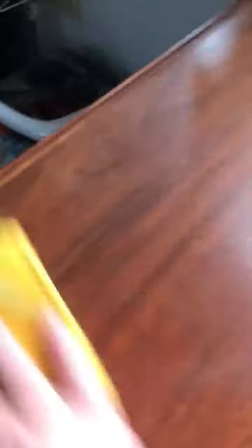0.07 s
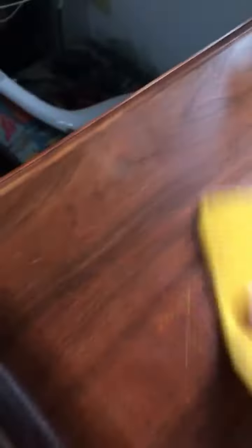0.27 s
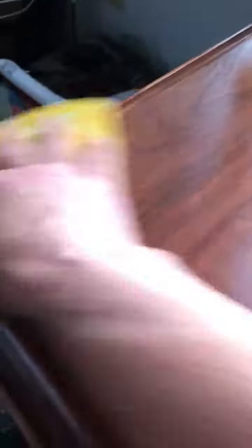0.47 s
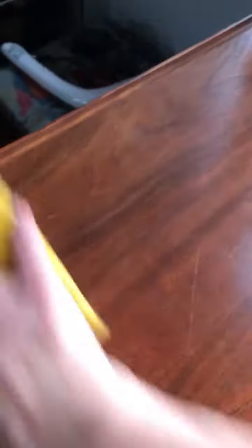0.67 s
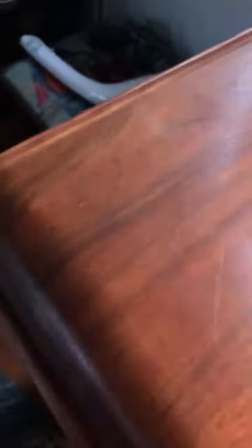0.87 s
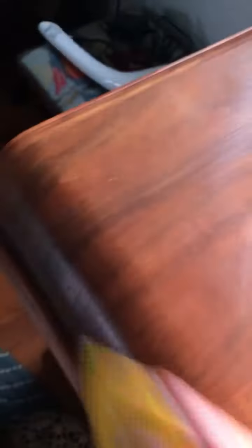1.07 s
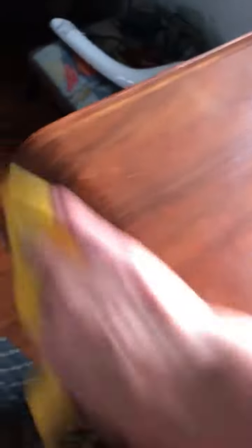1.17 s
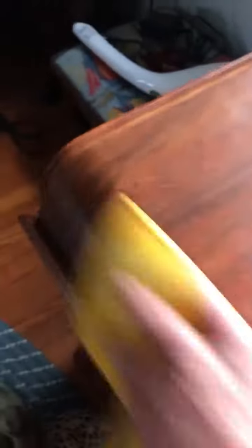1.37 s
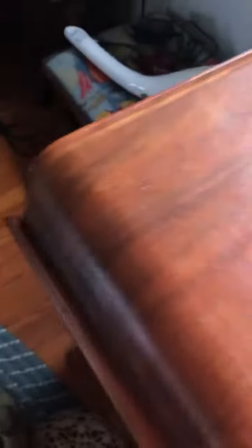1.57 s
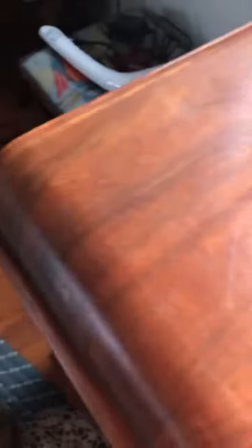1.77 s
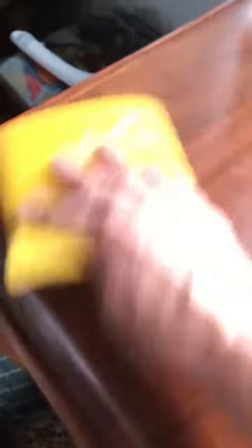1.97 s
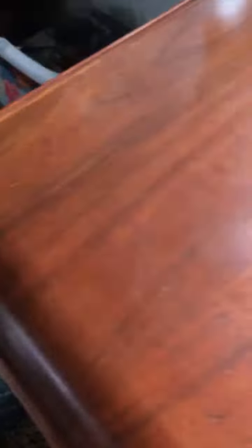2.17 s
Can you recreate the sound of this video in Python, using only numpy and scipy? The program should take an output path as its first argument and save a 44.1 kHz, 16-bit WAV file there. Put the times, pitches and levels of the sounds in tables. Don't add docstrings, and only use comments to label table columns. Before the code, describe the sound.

Close, dry cloth rubbing on smooth wood, swishing back and forth about three times a second; dull table thumps cluster in the first half second, two weaker ones follow, over a faint low room hum.

```python
import sys
import numpy as np
from scipy import signal
from scipy.fft import rfft, irfft
from scipy.io import wavfile
from scipy.ndimage import uniform_filter1d

SR = 44100
rng = np.random.default_rng(int(sys.argv[2]) if len(sys.argv) > 2 else 0)


def field_ratio(decibels):
    return 10 ** (np.asarray(decibels, dtype=float) / 20)


def transcribe(u):
    v = np.clip(np.atleast_2d(u).T, -1, 1)
    q = np.round(v * 32767).astype(np.int16)
    wavfile.write(sys.argv[1], SR, q)


N = 98431

# pitch_hz, level_db (per Hz)
ROOM_TONE = [(25, -26), (42, -5.5), (60, -20.5), (85, -5.5), (160, -15.5), (240, -11), (450, -21.5),
             (1200, -28.5)]
# pitch_hz, level_db, width_hz
HUM_TONES = [(60, -60.5, 5), (123, -68, 8)]
# pitch_hz, level_db (per Hz)
SHUDDER_TONE = [(40, -3), (70, -5.5), (130, -1.5), (240, -9.5), (400, -14.5), (800, -80)]
# start_s, thump_db, thump_hz, rise_s, tick_db
TABLE_KNOCKS = [
    (.042, -50, 125, .004, -75),
    (.182, -43, 95, .004, -75),
    (.1995, -32.5, 120, .0055, -41),
    (.2485, -36.5, 115, .0035, -53),
    (.3362, -33.5, 124, .0042, -46),
    (.3855, -37.5, 110, .0038, -60),
    (.7195, -41, 115, .0038, -66),
    (.806, -46, 120, .0035, -70),
]
# pitch_hz, level_db (against the thump), fade_s (to fall 60 dB)
TOP_RINGS = [(215, -11.5, 0.068), (261, -10.5, 0.066), (336, -16, 0.092), (420, -20.5, 0.053)]
# middle_s, length_s, level_db, pitch_hz, width_hz
CLOTH_CATCHES = [(.129, .014, -56, 1850, 150), (.183, .006, -47, 3500, 6000), (.787, .012, -48, 2780, 120),
                 (.985, .006, -57, 1300, 900), (1.865, .022, -51, 4000, 8000),
                 (2.14, .008, -57, 2500, 3000), (1.4, .006, -59, 1500, 1500), (.199, .01, -50, 2400, 2200),
                 (.05, .02, -53, 220, 40), (1.195, .02, -57, 1500, 400), (.11, .02, -53, 220, 40),
                 (.985, .02, -59, 300, 40)]
# pitch_hz, level_db (per Hz)
CLOTH_TONE = [(300, -29), (500, -19.5), (1150, -6.5), (1450, -1), (2800, -2), (8250, -4.5), (13500, -5),
              (15900, -13)]
# pitch_hz, width_hz, level_db
COLOUR_BUMPS = [(4910, 150, -3.5), (7490, 104, -2), (10530, 400, -3.5), (6640, 610, 1), (1550, 150, 0.5)]
# start_s, end_s, level_db, top_speed_at (0-1), fullness (exponent)
HAND_STROKES = [
    (-.2, 0.232, -50.5, 0.73, 0.2),
    (0.19, 0.392, -55, 0.64, 0.32),
    (0.338, 0.64, -52, 0.36, 4.9),
    (0.598, 0.969, -50.5, 0.64, 1),
    (0.98, 1.3, -50, 0.54, 1.64),
    (1.298, 1.662, -47.5, 0.54, 3.3),
    (1.685, 2.048, -49, 0.47, 1.76),
    (2.017, 2.39, -52, 0.27, 2.4),
]
# time_s, gap_hz, gap_db, fizz_db
HAND_SHAPE = [(0, 2800, -3.5, -8), (.07, 3200, 4, 3), (.13, 2100, 8.5, 2), (.21, 2180, 1, -5),
              (.28, 6000, 3.5, 6), (.35, 2000, -1.5, -3), (.44, 4570, 1, -3.5), (.7, 3000, -1, -3),
              (.75, 2600, 0, -7), (.81, 3500, 6.5, -0.5), (.95, 3740, 5.5, -2), (1.1, 3980, 8.5, 1),
              (1.2, 2500, 6.5, 0.5), (1.36, 3930, 1.5, 1.5), (1.53, 4500, 6, -1.5), (1.82, 5100, 4, 3),
              (1.95, 2700, 1.5, -3), (2.11, 6700, 3.5, 0)]


def evened(x):
    return x / np.sqrt(np.mean(x ** 2) + 1e-20)


def read(points, hz):
    f, value = np.transpose(points)
    return np.interp(np.log(hz + 1), np.log(f + 1), value)


def add(mix, s, sound):
    part = mix[round(s * SR):][:len(sound)]
    part += sound[:len(part)]


def resonate(x, hz, width):
    turn = np.exp(2j * np.pi * hz * np.arange(len(x)) / SR)
    r = np.exp(-np.pi * width / SR)
    return 2 * (turn * signal.lfilter([1 - r], [1, -r], x / turn)).real


def resonate_twice(x, hz, width):
    return resonate(resonate(x, hz, width), hz, width)


def coloured(points):
    white = rfft(rng.standard_normal(N))
    return evened(irfft(white * field_ratio(read(points, np.fft.rfftfreq(N, 1 / SR))), N))


def room():
    t = np.arange(N) / SR
    out = field_ratio(-61.5) * coloured(ROOM_TONE + [(2000, -84)])
    for hz, db, width in HUM_TONES:
        steady = np.sin(2 * np.pi * hz * t)
        wavering = evened(resonate_twice(rng.standard_normal(N), hz, width))
        out = out + field_ratio(db) * (steady + .45 * wavering)
    return out


def shudder():
    shake_db, shake_fade_s = -21, 1.0
    t = np.arange(SR) / SR
    power = field_ratio(-54.5 - 60 * np.arange(N) / SR / 2.5) ** 2
    for s, db, *_ in TABLE_KNOCKS:
        add(power, s, field_ratio(db + shake_db - 60 * t / shake_fade_s) ** 2 * np.tanh(t / 0.0094))
    return np.sqrt(power) * coloured(SHUDDER_TONE)


def knocks():
    tick_hz, tick_width_hz, tick_s, tick_lead_s = 900, 1300, .006, .0045
    tail_db, tail_s = -14.5, 0.051
    sag_per_s = 10
    out, t = np.zeros(N), np.arange(6000) / SR
    rings = sum(field_ratio(db - 60 * t / fade) * np.sin(2 * np.pi * hz * t) for hz, db, fade in TOP_RINGS)
    rings = rings * np.tanh(t / 0.0019)
    for s, db, hz, rise, tick_db in TABLE_KNOCKS:
        swell = (t / rise / 2) ** 2 * np.exp(2 - t / rise)
        thump = swell * np.sin(2 * np.pi * hz * t * np.maximum(1 - sag_per_s * t, .5))
        tick = evened(resonate_twice(rng.standard_normal(6000), tick_hz, tick_width_hz))
        tick = tick * np.tanh(t / .0015)
        tick = tick * (np.exp(-t / tick_s) + field_ratio(tail_db) * np.exp(-t / tail_s))
        add(out, s, field_ratio(db) * (thump + rings))
        add(out, s - tick_lead_s, field_ratio(tick_db) * tick)
    return out


def catches():
    out, t = np.zeros(N), np.arange(-2000, 2000) / SR
    for s, length, db, hz, width in CLOTH_CATCHES:
        scuff = evened(resonate(rng.standard_normal(4000), hz, width))
        add(out, s + t[0], field_ratio(db) * scuff * np.exp(-2 * (t / length) ** 2))
    return out


def speed(t):
    turn_share, turn_quickness, rest_db = 0.37, 4.3, -65
    power = field_ratio(rest_db) ** 2
    for start, end, db, top, fullness in HAND_STROKES:
        progress = np.clip((t - start) / (end - start), 0, 1)
        u = progress ** (np.log(.5) / np.log(np.clip(top, .1, .9)))
        arch = abs(np.sin(np.pi * u)) * (u < 1)
        turn = np.tanh(turn_quickness * arch)
        power = power + (field_ratio(db) * (turn_share * turn + (1 - turn_share) * arch ** fullness)) ** 2
    return np.sqrt(power)


def fibre_slips():
    slips_per_s, spread_db, cap = 9000, 0.5, .003
    luck, size, sign = rng.random((3, N))
    return (luck < slips_per_s / SR) * field_ratio(-spread_db * np.log(size + cap)) * np.sign(sign - .5)


def hand_colour(hz, t):
    gap_octaves, fizz_from_hz = .6, 9500
    slow_dull, dull_above_hz = .14, 4500
    s, gap_hz, gap_db, fizz_db = np.transpose(HAND_SHAPE)
    f = hz[:, None] + 1
    octaves_off = np.log2(f / np.interp(t, s, gap_hz))
    field = read(CLOTH_TONE, f) + np.interp(t, s, gap_db) * np.exp(-.5 * (octaves_off / gap_octaves) ** 2)
    field = field + np.interp(t, s, fizz_db) / (1 + (fizz_from_hz / f) ** 6)
    for at, width, db in COLOUR_BUMPS:
        field = field + db * np.exp(-.5 * ((f - at) / width) ** 2)
    speed_db = 20 * np.log10(speed(t) / speed(t).max())
    return field + slow_dull * speed_db / (1 + (dull_above_hz / f) ** 4)


def drifting(frames, bins, long, wide):
    patches = uniform_filter1d(rng.standard_normal((frames, bins)), long, 0)
    return evened(uniform_filter1d(patches, wide, 1)).T


def rub():
    patch_db, panel_db, flicker_db = 1.0, 2.0, 0.27
    hz, t, z = signal.stft(fibre_slips(), SR, nperseg=1024, noverlap=896)
    field = hand_colour(hz, t)
    grain = patch_db * drifting(len(t), len(hz), 16, 14) + panel_db * drifting(len(t), len(hz), 40, 2)
    loudness = np.sqrt((field_ratio(field) ** 2).mean(0))
    z = z * field_ratio(field + grain) / loudness
    hiss = signal.istft(z, SR, nperseg=1024, noverlap=896)[1][:N]
    flicker = uniform_filter1d(rng.standard_normal(N), size=600)
    flicker = evened(uniform_filter1d(flicker, size=600))
    return evened(hiss) * speed(np.arange(N) / SR) * field_ratio(flicker_db * flicker)


def scene():
    return np.tile(room() + shudder() + knocks() + catches() + rub(), (2, 1))


def low_pass(x):
    return signal.sosfilt(signal.butter(12, 16110, fs=SR, output="sos"), x)


def record(dry):
    hz = np.fft.rfftfreq(N, 1 / SR) + 1
    mix = irfft(rfft(dry) / (1 + (30 / hz) ** 6), N)
    return low_pass(mix)


dry = scene()
out = record(dry)
transcribe(out)
```